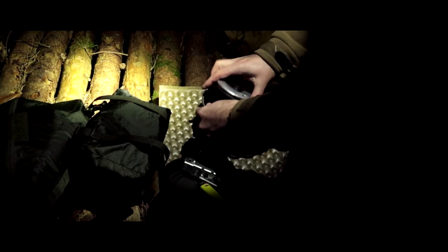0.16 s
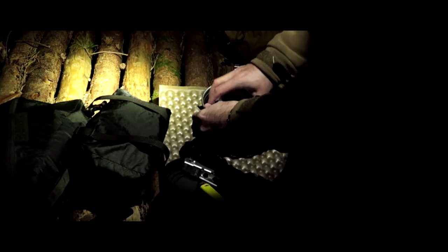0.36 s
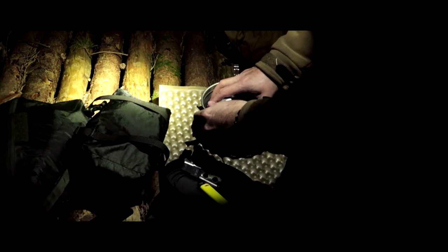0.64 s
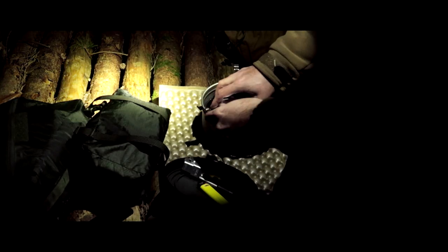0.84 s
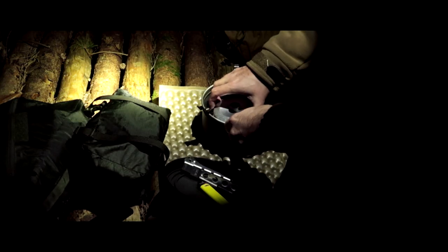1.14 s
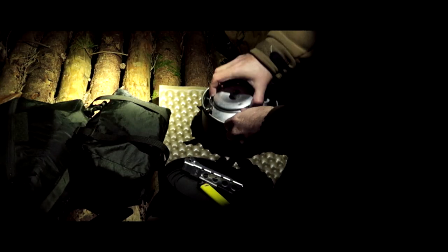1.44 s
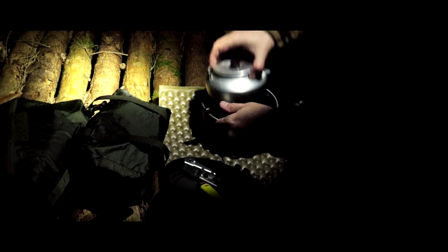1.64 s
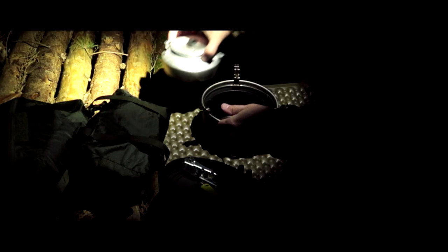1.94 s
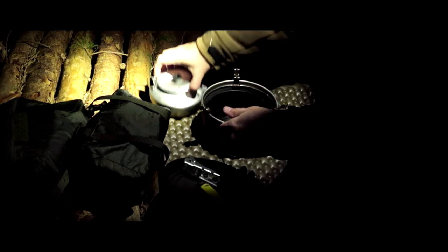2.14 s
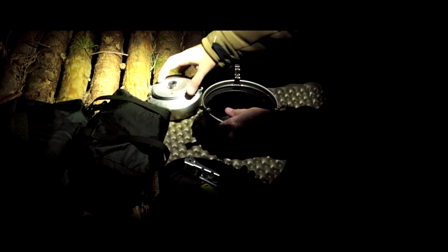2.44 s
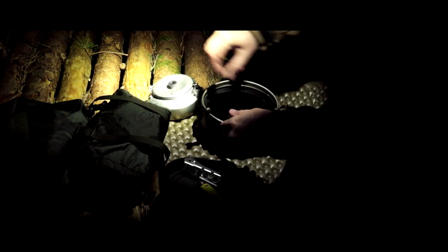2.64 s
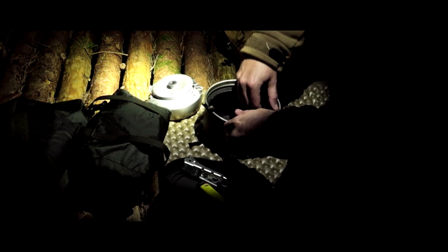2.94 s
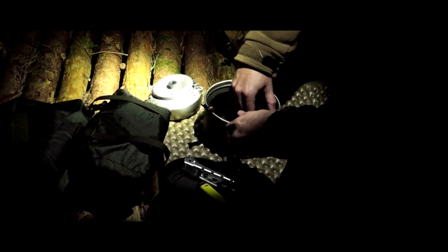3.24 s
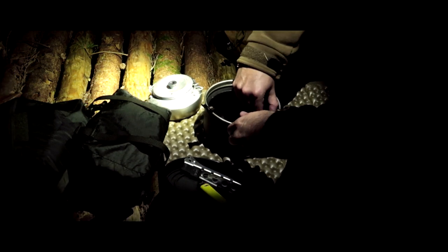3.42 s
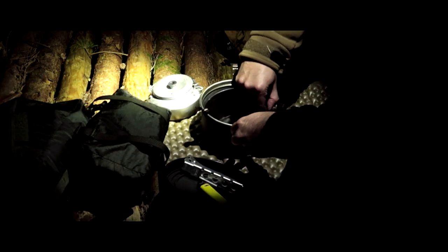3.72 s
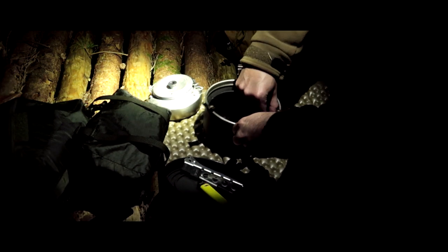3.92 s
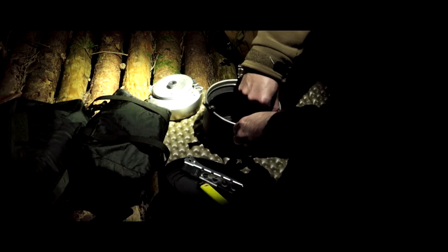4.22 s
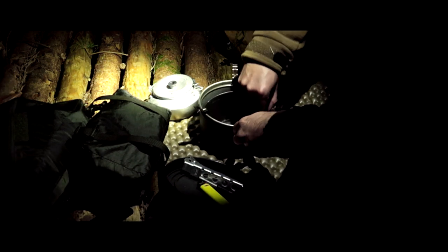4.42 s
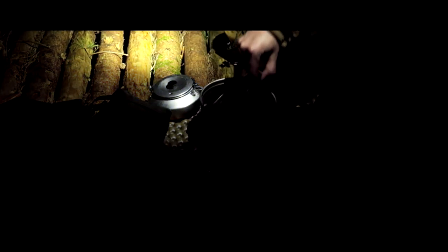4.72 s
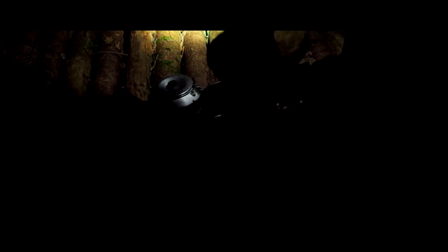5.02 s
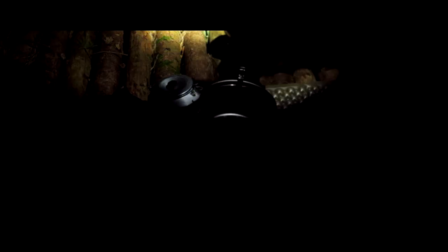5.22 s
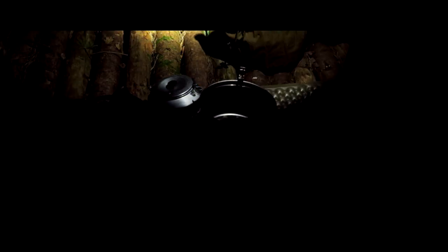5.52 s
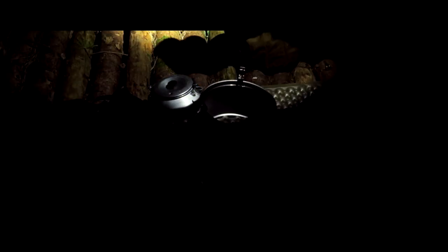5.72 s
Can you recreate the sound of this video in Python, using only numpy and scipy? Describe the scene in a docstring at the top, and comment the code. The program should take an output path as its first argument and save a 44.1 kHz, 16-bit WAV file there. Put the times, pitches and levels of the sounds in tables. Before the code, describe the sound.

A small metal kettle clinks sharply as it is worked loose from a nest of pots, then lands on a log bench with a bright double clack and dull thump. Light knocks and scrapes follow inside a larger pot as a hand gropes for a small stove, ending in a loud pot clank and handle rattle. Close stereo microphone, dry open air, faint hiss and low hum.

```python
"""Kettle, pot and camp stove

A small metal kettle is lifted out of a nest of camping pots and set down on a log bench at night.
A hand gropes for a small stove in the large pot and knocks its wall; a wire handle rattles.
Metal is decaying wall modes plus bursts of resonant noise; bench thumps and a rim ping are decaying sines.
Shaped noise gives the rustle of sleeves and fingers and the faint hiss; wavering sines and noise, the low hum."""
import sys
import numpy as np
from scipy import signal
from scipy.fft import rfft, irfft, next_fast_len
from scipy.io import wavfile

SR = 44100
rng = np.random.default_rng(int(sys.argv[2]) if len(sys.argv) > 2 else 0)


def output_pcm(signal):
    """Save a mono or channel-first signal as 16-bit PCM at the path in sys.argv[1].

    Samples are clipped to [-1, 1] before scaling.
    """
    pcm = np.clip(np.atleast_2d(signal).T, -1, 1) * 32767
    wavfile.write(sys.argv[1], SR, np.round(pcm).astype(np.int16))


N = 258426

# A blow has strength, hardness (bare metal against a cushioned touch) and weight (how much vessel is behind it).
# Register edges [Hz]: boom, body, clank, ring, sizzle
REGISTER_EDGES_HZ = [100, 490, 1400, 3600, 7500, 16000]
# Share of the hardness and of the weight taken by each register [dB/dB]
HARDNESS_SHARE = [0, 0.03, 0.046, 0.85, 1]
WEIGHT_SHARE = [1, 0.71, 0.009, 0, 0.0075]
# Register balance of an ordinary blow [dB]
KETTLE_VOICE_DB = [2, -3.5, 1, -12.5, -23]
POT_VOICE_DB = [-6, -3.5, -0.5, -13, -16.5]
STOVE_VOICE_DB = [-8.5, 6, 0.5, -26.5, -37.5]
HANDLE_VOICE_DB = [-7, -15, 1, -9.5, -9]

# Blows on kettle, on pot, and of the stove inside the pot:
# (time [s], strength [dB], hardness [dB], weight [dB], contact [s], at least 0.001 in use)
KETTLE_BLOWS = [(0.007, -44.5, -9, -6, 0.0047), (0.043, -41, -7, -37, 0.0034), (0.25, -51, 7, -4.5, 0.017),
                (0.477, -50, 8, 5.5, 0.022), (0.504, -30, 15.5, -5.5, 0.005), (0.532, -40.5, -3, -2, .018),
                (0.692, -19, -4.5, 1, 0.016), (0.742, -45.5, -6, 5.5, .004), (1.005, -54.5, 2, -7, .025),
                (1.394, -52.5, -10, 5, 0.046), (1.456, -48, -9, 8, 0.046), (1.494, -45, -10, -5, 0.043),
                (2.229, -45.5, 7, 7, 0.026), (2.2485, -22.5, 3.5, -1, 0.00092),
                (2.265, -27.5, 0.5, -4, 0.026), (2.297, -29.5, -1.5, 0, 0.0038),
                (2.479, -32, 1, -0.5, 0.009), (2.495, -16, 3.5, -14.5, 0.0017),
                (2.5425, -20, -2, -11.5, 0.0047)]
POT_BLOWS = [(2.92, -55, 8, -6, .008), (2.958, -48.5, -5, 7.5, 0.0073), (3.046, -43, -4, 4.5, .008),
             (3.083, -36.5, -10, 5.5, 0.012), (3.168, -47, -7.5, 2, .006), (3.184, -38.5, -5, 4.5, 0.011),
             (3.205, -38, 3.5, 3, 0.019), (3.411, -42, 5.5, 1, 0.012), (3.477, -38.5, 1.5, 1, 0.022),
             (3.716, -40.5, -5, 5, 0.0027), (3.793, -45.5, -12, 10, 0.0098),
             (3.9535, -18.5, -12, -10.5, 0.0034), (4.126, -32.5, -1.5, -2, .009),
             (4.195, -44.5, 0, -7, .008), (4.702, -32.5, 4, 2.5, 0.016), (4.7315, -10.5, 1.5, -6, 0.01),
             (4.776, -10, 4, -8.5, .01), (4.82, -46.5, 22.5, 7.5, 0.052)]
STOVE_BLOWS = [(1.329, -38.5, -20, 2.5, 0.014), (3.637, -45, -13, -3, 0.0033), (3.898, -35, 18, 8.5, 0.02),
               (3.927, -42.5, 1, 5, 0.0057), (4.233, -43, -3, -8, 0.002), (4.5155, -30.5, -11, -9, 0.0081),
               (4.658, -36, 6, -19.5, .003)]
# Clinks of the wire handle: (time [s], strength [dB], hardness [dB], weight [dB], rebounds [count])
HANDLE_CLINKS = [(3.519, -45, -0.5, -1, 0), (4.166, -42, 2, -4, 0), (4.864, -27.5, -5, -5.5, 0),
                 (4.909, -34.5, 5.5, -5.5, 0), (5.021, -45.5, -8, -13, 0), (5.202, -44.5, -6, -4, 0),
                 (5.223, -36.5, 3, -5, 2)]
# Groping in the pot: (start [s], end [s])
GROPING_SPAN_S = (2.85, 5)
# Fingertip touch: (mean strength [dB], hardness [dB], weight [dB], contact [s])
FINGER_TOUCH = (-59, 5, 4, 0.08)

# Wall modes: (frequency [Hz], relative level [dB], free t60 [s])
KETTLE_MODES = [(350, -3, .06), (392, 1, .06), (470, -4, .04), (748, -16, .07), (1130, -13, .05),
                (1445, -8, .07), (1620, -13, .07), (2030, -8, .05), (2212, 6, .062), (2536, -15, .07),
                (3085, 5, .05), (3230, -3, .045), (4020, -17, .06), (4590, -18, .07), (4790, -17, .08),
                (6950, -27, .05), (10900, -28, .07)]
POT_MODES = [(305, -1, .09), (450, -1, .05), (603, 4, .23), (778, -24, .9), (980, -4, .06), (1084, -5, .25),
             (1215, -7, .1), (1443, -9, .15), (1706, -6, .46), (1752, 3, .09), (1905, 3, .1), (2070, 0, .2),
             (2143, -2, .28), (2176, 3, .08), (2385, -3, .14), (2525, -10, .38), (2598, 3, .1),
             (2789, -12, .16), (3047, -8, .18), (3384, 6, .075), (3540, -10, .25), (4070, -6, .12),
             (4425, -24, .22), (5480, -16, .14), (6072, -23, .18), (6460, -20, .11)]
STOVE_MODES = [(826, 1, .085), (1000, 0, .07), (1170, -1, .04), (1500, -3, .05), (1700, -6, .045),
               (2260, -6, .06)]
HANDLE_MODES = [(778, -19, .35), (2080, -9, .12), (2915, -2, .13), (2970, -6, .1), (3160, -7, .08),
                (3564, 1.5, .08), (3790, -5, .07), (4720, -13, .06), (5760, -13, .05), (6212, -17, .05)]
# Spectra of crowded short-lived modes; the stove shares the pot's: (frequency [Hz], relative density [dB/Hz])
KETTLE_CLATTER = [(60, -39), (150, -30), (240, -1.5), (370, 6.5), (600, -1.5), (1000, -2), (2100, 3.5),
                  (3200, -4), (3800, -15), (5000, -11.5), (8000, -22.5), (12500, -19.5), (16000, -39)]
POT_CLATTER = [(60, -6), (150, -5.5), (280, 1.5), (550, 4), (1100, 10.5), (1400, 10.5), (1900, 16.5),
               (2900, 9.5), (3800, 1.5), (5500, -5), (7500, -34.5), (12500, -34), (16000, -52)]
HANDLE_CLATTER = [(150, -1), (550, -5), (1400, 6.5), (2000, 14.5), (3200, 15), (4200, 9), (5500, 4),
                  (7500, -21), (12500, -24), (16000, -42)]
# Stereo width of a blow: (frequency [Hz], side minus mid [dB])
BLOW_WIDTH = [(150, -63), (1200, -55), (2500, -27), (4400, -12.5), (8000, -3.5), (15000, -7.5)]

# Lid rim set singing by one hard clink: (time [s], level [dB], frequency [Hz], t60 [s])
RIM_PING = (0.505, -43, 8704, 0.15)
# Soft thumps of kettle and pot on the logs: (time [s], level [dB], frequency [Hz], t60 [s])
LOG_THUMPS = [(0.7748, -13.5, 364, 0.024), (0.798, -20, 336, 0.031), (1.212, -23, 360, 0.017),
              (2.223, -17, 183, 0.075), (2.25, -27, 113.4, .12), (2.506, -6.5, 383, 0.036),
              (3.206, -28, 178, 0.086), (4.844, -23.5, 201, 0.072), (4.859, -16, 125, 0.021),
              (4.976, -25, 167, 0.021)]
# Strokes of sleeves and fingers on metal: (centre time [s], length [s], level before rub gain [dB])
RUB_STROKES = [(0.05, 0.31, -43), (0.706, 0.31, -45), (0.914, 0.38, -47), (1.448, 0.3, -45.5),
               (3.12, 0.41, -47.5), (3.908, 0.43, -48.5), (4.613, 0.36, -42)]
# Spectrum of rubbing: (frequency [Hz], relative density [dB/Hz])
RUB_SPECTRUM = [(150, 2), (350, -2.5), (700, -2), (1400, 1.5), (2300, 2), (3200, -3.5), (4500, -12),
                (8000, -20), (13000, -25), (16000, -47)]
# Still night air and microphone hiss: (frequency [Hz], relative density [dB/Hz])
HISS_SPECTRUM = [(120, -15.5), (200, -6), (353, -2.5), (519, -6.5), (683, -3.5), (1080, -13), (1160, -10.5),
                 (3070, -16.5), (4040, -17), (14300, -34), (16000, -60)]
# Hum partials: (frequency [Hz], rms level before waver [dB])
HUM_PARTIALS = [(50, -62.5), (100, -58.5), (151, -62.5), (200, -70), (301, -67.5), (350, -69)]
# Noise around the hum: (frequency [Hz], relative density [dB/Hz])
RUMBLE_SPECTRUM = [(20, -37), (48, -9), (75, -1.5), (115, -1.5), (190, -8), (400, -11.5), (900, -53)]

BLOW_SAMPLES = 2 ** 15
RELEASE_S = 4.72  # the hand lets go of the pot; blows before this use the held ring times
HANDLE_CONTACT_S, REBOUND_S, REBOUND_LOSS_DB = 0.012, 0.044, 5
CUTOFF_HZ = 15800


def kettle():
    """Kettle wall, slightly damped by the hand: strong short modes over clatter."""
    return vessel(KETTLE_BLOWS, KETTLE_MODES, KETTLE_CLATTER, KETTLE_VOICE_DB, modes_db=6, scatter_db=0.5,
                  t60_s=0.064, chatter_db=0, tail_db=-25, tail_t60_s=0.21, held_ring=0.92)


def pot():
    """Large pot wall, struck and brushed: longer modes, cut to under half while held."""
    blows = [*POT_BLOWS, *touches(count=4)]
    return vessel(blows, POT_MODES, POT_CLATTER, POT_VOICE_DB, modes_db=-7.5, scatter_db=1.2,
                  t60_s=0.065, chatter_db=1.5, tail_db=-18, tail_t60_s=0.19, held_ring=0.45)


def stove():
    """Small stove knocking inside the pot: few modes, weak upper registers."""
    return vessel(STOVE_BLOWS, STOVE_MODES, POT_CLATTER, STOVE_VOICE_DB, modes_db=0, scatter_db=1.5,
                  t60_s=0.035, chatter_db=1.0, tail_db=-10, tail_t60_s=0.15)


def handle():
    """Wire handle: thin metal chatters higher than the pot wall."""
    blows = rebounding(HANDLE_CLINKS)
    return vessel(blows, HANDLE_MODES, HANDLE_CLATTER, HANDLE_VOICE_DB, modes_db=6.5, scatter_db=4,
                  t60_s=0.071, chatter_db=0.5, tail_db=-17, tail_t60_s=0.22)


def vessel(blows, modes, spectrum, voice_db, modes_db, scatter_db, t60_s, chatter_db, tail_db, tail_t60_s,
           held_ring=1):
    """Modes and clatter per blow; hardness weights mostly the upper registers, weight the lower."""
    mid_side = np.zeros((2, N + BLOW_SAMPLES))
    t = np.arange(BLOW_SAMPLES) / SR
    registers = [signal.butter(5, edges, "band", fs=SR, output="sos")
                 for edges in zip(REGISTER_EDGES_HZ, REGISTER_EDGES_HZ[1:])]
    attack = SR // 50  # register levels are set over the first 20 ms
    for time_s, strength_db, hardness_db, weight_db, contact_s in blows:
        contact_s = max(contact_s, 0.001)
        at = max(round(time_s * SR), 0)
        ring_share = held_ring if time_s < RELEASE_S else 1
        damped = np.multiply(modes, [1, 1, ring_share])
        ring = from_db(modes_db) * wall_modes(damped, t, contact_s, scatter_db)
        blow = ring + clatter(spectrum, t, contact_s, t60_s, chatter_db, tail_db, tail_t60_s)
        hardness_tilt_db = hardness_db * np.array(HARDNESS_SHARE)
        weight_tilt_db = weight_db * np.array(WEIGHT_SHARE)
        levels_db = strength_db + np.array(voice_db) + hardness_tilt_db + weight_tilt_db
        for sos, level_db in zip(registers, levels_db):
            part = signal.sosfilt(sos, blow + 1e-18)
            mid_side[:, at:at + BLOW_SAMPLES] += part * from_db(level_db) / np.std(part[0, :attack])
    mid, side = mid_side[:, :N]
    return np.array([mid + side, mid - side])


def wall_modes(modes, t, contact_s, scatter_db):
    """Each blow lands on a new spot, so mode strengths vary; the ring builds up during contact."""
    hz, db, t60_s = np.transpose(modes)[:, :, None]
    strength = from_db(db + scatter_db * rng.standard_normal(hz.shape))
    phase = rng.uniform(0, 2 * np.pi, hz.shape)
    # short waves reach the two microphone ports out of step
    side_gain = from_db(np.interp(hz, *np.transpose(BLOW_WIDTH))) * rng.choice([-1, 1], hz.shape)
    rings = strength * from_db(-60 * t / t60_s) * np.sin(2 * np.pi * hz * t + phase)
    build_up = 1 - np.exp(-8 * t / contact_s)
    return np.array([rings.sum(0), (rings * side_gain).sum(0)]) * build_up


def clatter(spectrum, t, contact_s, t60_s, chatter_db, tail_db, tail_t60_s):
    """First crack, metal-on-metal chatter through the contact, fast decay, weak diffuse tail."""
    mid, side = crowd(spectrum, len(t), lumps_db=4.5, spacing_hz=100)
    crack = from_db(-10) * np.exp(-t / 0.0055)
    decay_db = -60 * np.maximum(t - contact_s, 0) / t60_s
    chatter = from_db(chatter_db * drift(396, len(t)) + decay_db)
    tail = from_db(tail_db - 60 * t / tail_t60_s)
    onset = 1 - np.exp(-t / 0.000094)
    return np.array([mid, coloured(side, BLOW_WIDTH)]) * (crack + chatter + tail) * onset


def crowd(spectrum, size, lumps_db, spacing_hz):
    """Noise gathered into narrow resonances that differ at each point of contact."""
    knots_hz = np.arange(0, SR, spacing_hz)
    heights = np.clip(rng.standard_normal(len(knots_hz)), -2, 2)
    bins_hz = np.arange(size // 2 + 1) * SR / size
    lumps = from_db(lumps_db * np.interp(bins_hz, knots_hz, heights))
    lumpy = irfft(rfft(rng.standard_normal((2, size))) * lumps, size)
    return rms_one(coloured(lumpy, spectrum))


def touches(count):
    """Fingertips brush the pot wall at random times, strength uniform within 3 dB of the mean."""
    start_s, end_s = GROPING_SPAN_S
    mean_db, *rest = FINGER_TOUCH
    return [(start_s + when * (end_s - start_s), mean_db + 6 * (force - 0.5), *rest)
            for when, force in rng.random((count, 2))]


def rebounding(clinks):
    """The loose handle falls back as often as listed, evenly spaced and ever weaker."""
    return [(time_s + k * REBOUND_S, db - k * REBOUND_LOSS_DB, hardness_db, weight_db, HANDLE_CONTACT_S)
            for time_s, db, hardness_db, weight_db, rebounds in clinks
            for k in range(rebounds + 1)]


def rim():
    """Singing lid rim: one thin, high decaying sine."""
    return decaying_sine(*RIM_PING)[0]


def logs(rise_s):
    """Weight lands softly on the bench, which answers with a few low swings."""
    out = np.zeros(N)
    for thump in LOG_THUMPS:
        swing, t = decaying_sine(*thump)
        out += swing * (1 - np.exp(-t / rise_s))
    return out


def decaying_sine(time_s, level_db, hz, t60_s):
    """One damped resonance, with the time since its start."""
    t = np.maximum(np.arange(N) / SR - time_s, 0)
    return from_db(level_db - np.minimum(60 * t / t60_s, 200)) * np.sin(2 * np.pi * hz * t), t


def hands(gain_db, stir_db, grain_db, side_db):
    """Cloth and skin slide in small uneven slips; strokes follow bell curves over a faint stir."""
    t = np.arange(N) / SR
    power = from_db(stir_db) ** 2
    for time_s, length_s, db in RUB_STROKES:
        power = power + from_db(db) ** 2 * np.exp(-2 * (2 * (t - time_s) / length_s) ** 2)
    mid, side = noise(RUB_SPECTRUM, (2, N))
    slips = from_db(grain_db * (drift(60) + drift(400)))
    stereo = mid + from_db(side_db) * side * np.array([[1], [-1]])
    return from_db(gain_db) * np.sqrt(power) * slips * stereo


def background(hiss_db, rumble_db, waver_db):
    """Wide hiss; centred hum, wavering in level and phase; centred low noise."""
    t = np.arange(N) / SR
    hum = np.zeros(N)
    for hz, db in HUM_PARTIALS:
        level = np.sqrt(2) * from_db(db + waver_db * drift(9))
        hum += level * np.sin(2 * np.pi * hz * t + 0.29 * drift(2.3))
    hiss = from_db(hiss_db) * noise(HISS_SPECTRUM, (2, N))
    return hiss + hum + from_db(rumble_db) * noise(RUMBLE_SPECTRUM, N)


def noise(spectrum, shape):
    """Coloured noise of unit power."""
    return rms_one(coloured(rng.standard_normal(shape), spectrum))


def coloured(x, spectrum):
    """Filter by (frequency [Hz], gain [dB]) points, interpolated over log frequency."""
    hz, db = np.transpose(spectrum)
    size = next_fast_len(x.shape[-1])
    bins_hz = np.maximum(np.arange(size // 2 + 1) * SR / size, 1)
    gain = from_db(np.interp(np.log(bins_hz), np.log(hz), db))
    return irfft(rfft(x, size) * gain, size)[..., :x.shape[-1]]


def drift(rate_hz, size=N):
    """Straight lines between normal random values, rate_hz of them a second."""
    return np.interp(np.arange(size) / SR * rate_hz, np.arange(8000), rng.standard_normal(8000))


def rms_one(x):
    """Scale to unit power."""
    return x / np.sqrt(np.mean(x ** 2) + 1e-20)


def from_db(db):
    """Decibels to gain."""
    return 10 ** (np.asarray(db) / 20)


def scene():
    """Kettle, pot, stove, handle and hands in the open air."""
    metal = kettle() + pot() + stove() + handle() + rim()
    rustle = hands(gain_db=-4.5, stir_db=-57.5, grain_db=1.6, side_db=-14.5)
    air = background(hiss_db=-50.5, rumble_db=-59, waver_db=2.5)
    return metal + logs(rise_s=0.0018) + rustle + air


def record(dry):
    """Soft saturation rounds the loudest peaks; a steep low-pass cuts the top."""
    rounded = dry / (1 + dry ** 4) ** (1 / 4)
    low_pass = signal.ellip(10, 0.1, 80, CUTOFF_HZ, fs=SR, output="sos")
    return signal.sosfilt(low_pass, rounded)


dry = scene()
out = record(dry)
output_pcm(out)
```